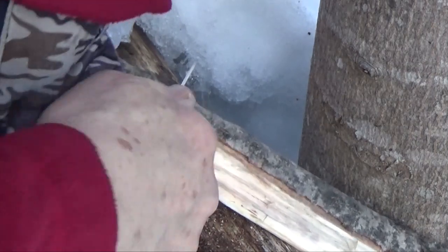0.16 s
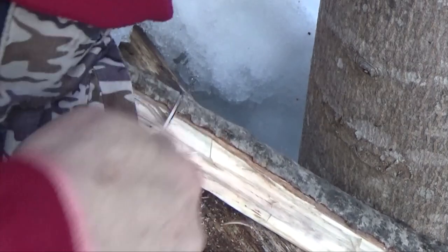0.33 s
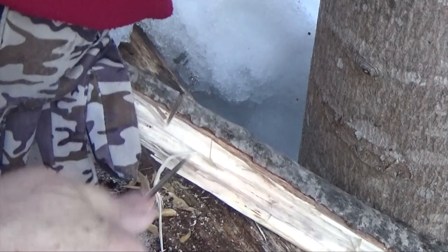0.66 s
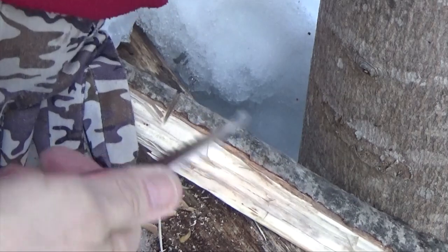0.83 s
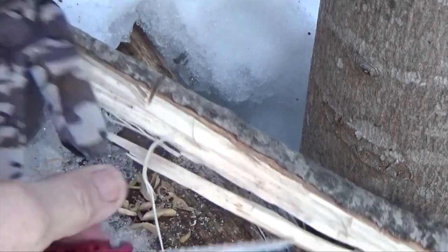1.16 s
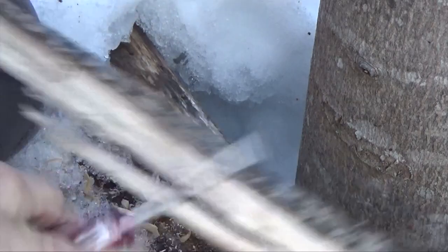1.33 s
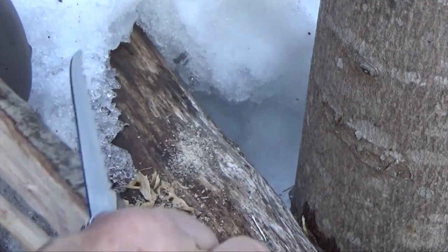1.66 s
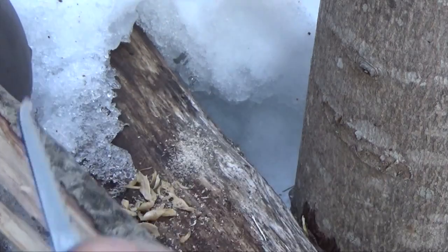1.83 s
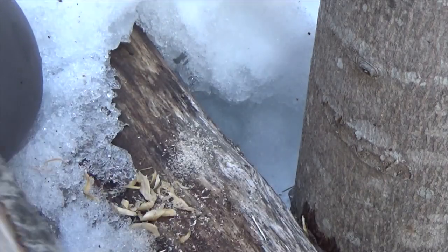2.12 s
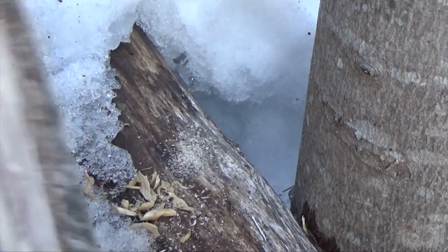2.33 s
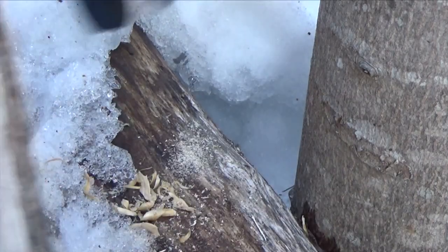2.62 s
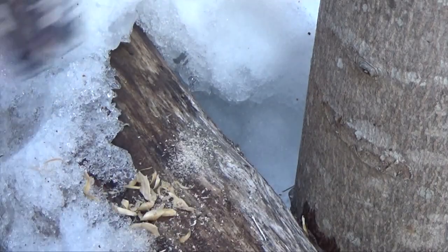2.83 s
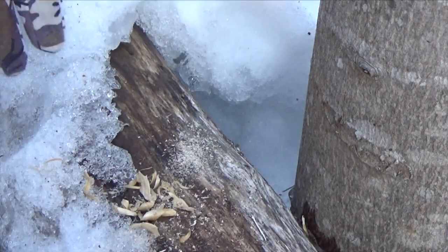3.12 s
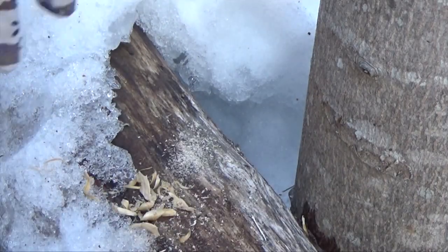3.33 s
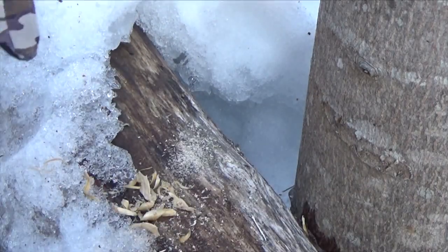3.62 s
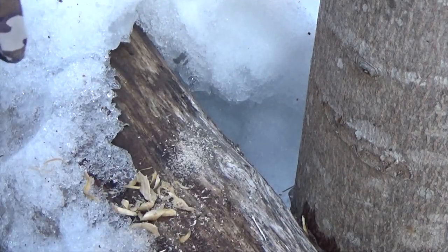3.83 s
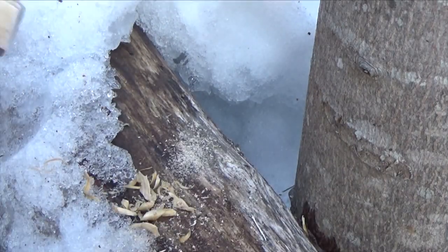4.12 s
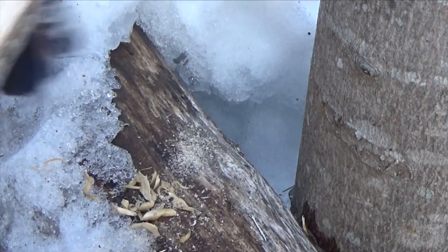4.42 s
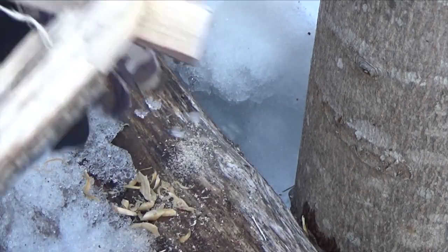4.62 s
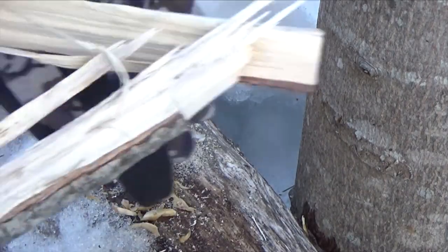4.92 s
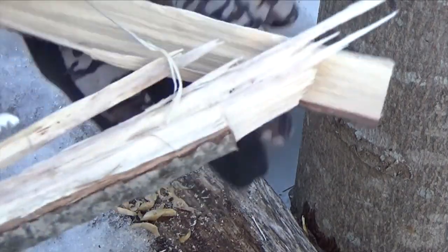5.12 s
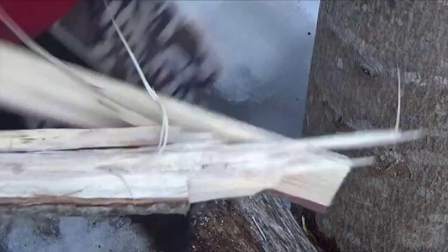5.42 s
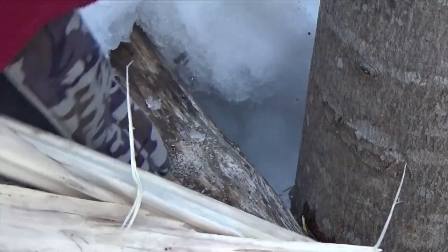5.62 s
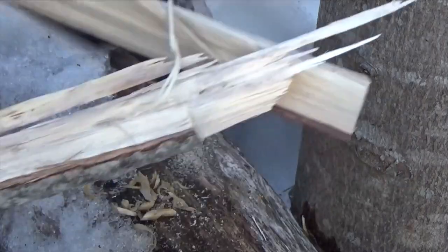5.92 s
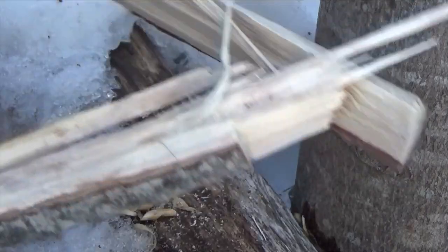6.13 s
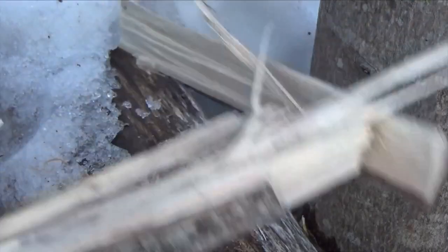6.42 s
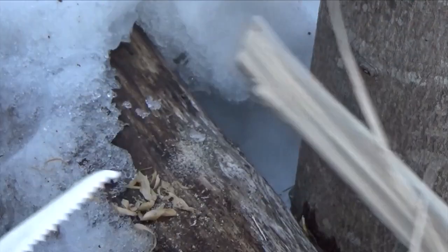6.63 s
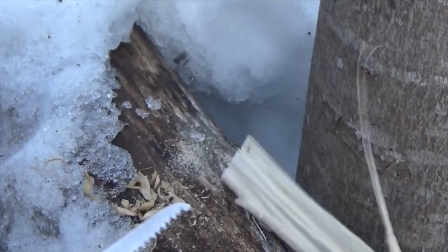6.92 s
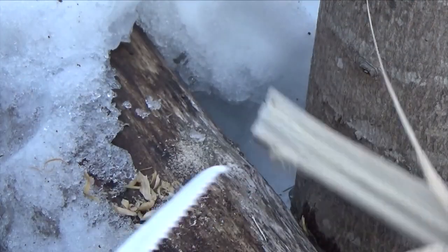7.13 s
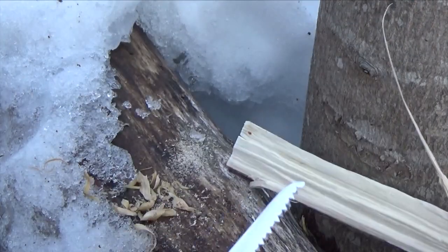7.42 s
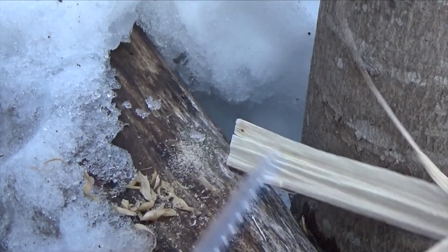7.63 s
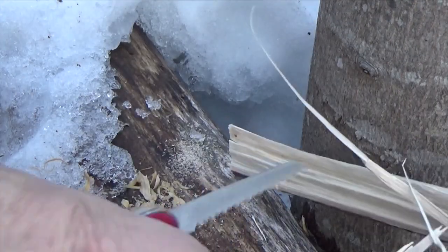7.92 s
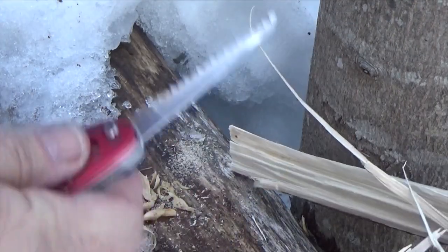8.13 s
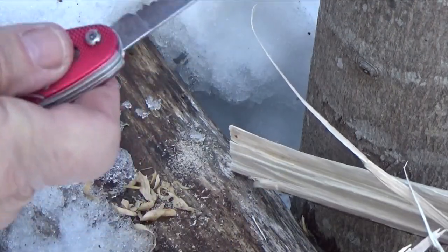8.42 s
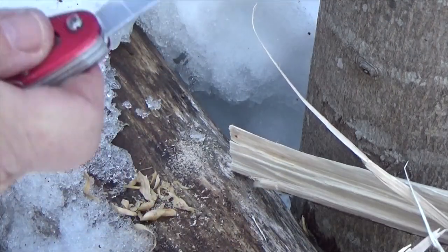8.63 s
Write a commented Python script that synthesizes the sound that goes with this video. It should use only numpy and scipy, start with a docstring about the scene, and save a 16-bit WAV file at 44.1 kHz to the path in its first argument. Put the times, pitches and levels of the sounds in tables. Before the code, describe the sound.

A small saw rasps briefly through a log outdoors; the piece is dragged off squeaking, its fibres snap in a flurry, then a blade taps ringing wood.

```python
"""A small folding saw makes quick strokes through a split log in snowy woods: rough noise for the teeth.
Gloved hands drag the piece off, rubbing and squeaking, and its fibres crack: short puffs of noise.
The blade then taps the cut end and the stick rings: fading sine tones. Low bumps come from the log below.
Behind it lie the filtered noise of a far road, a soft engine drone and a faint, quick, steady tick."""
import sys
import numpy as np
from scipy import signal
from scipy.fft import rfft, irfft
from scipy.io import wavfile
from scipy.ndimage import uniform_filter1d

SR = 44100
rng = np.random.default_rng(int(sys.argv[2]) if len(sys.argv) > 2 else 0)


def file_out(sig):
    """Save sig as 16-bit WAV at sys.argv[1]."""
    # one column per channel
    cols = np.atleast_2d(sig).T
    # limit, then scale
    lim = np.clip(cols, -1, 1)
    pcm = np.round(lim * 32767).astype(np.int16)
    wavfile.write(sys.argv[1], SR, pcm)


N = 386316

# Saw strokes: start_s, fastest_s, end_s, rasp_db, extra_bite_db (at the fastest point), log_body_db (above the rasp)
SAW_STROKES = [(-.03, 0.044, 0.078, -34, 4, -9), (0.072, .168, 0.19, -29, 9, -8.5),
               (0.226, 0.325, 0.39, -31, 4, -9.5), (0.38, 0.462, 0.511, -30, 9, -7),
               (0.548, 0.622, 0.696, -27.5, 5.5, -13)]
# Tone colour of the saw teeth: pitch_hz, level_db (per Hz)
RASP_COLOUR = [(710, -36.5), (1200, -3.5), (2080, -1), (3050, -6.5), (4470, -2.5), (5330, -6.5),
               (11400, -6), (15300, -14.5), (16500, -38)]
# Tone colour of the shaken log: pitch_hz, level_db (per Hz)
LOG_COLOUR = [(35, -94), (60, -21), (210, -14), (250, -2), (440, 3.5), (875, 2), (1500, -4.5), (1950, -3),
              (3300, -120)]
STROKE_SWELL, BITE_S = 1.46, .01  # power of the swell (no unit); half-length of the extra bite

# Road loudness, 1.5 dB below the final level: time_s, level_db
# It drops at 3.36 s and 7.0 s and creeps back up after the first drop
ROAD_LEVEL = [
    [(0, -55.5), (2.3, -55), (2.9, -52), (3.35, -56)],
    [(3.38, -62), (4.0, -63), (4.3, -62), (6.45, -58), (6.96, -54.5)],
    [(7.06, -59), (8.76, -58.5)],
]
# Tone colour of the road roar: pitch_hz, level_db (per Hz)
ROAR_COLOUR = [(15, -60), (25, -45), (154, -13), (422, -5), (524, -2), (854, -1), (1730, -15),
               (3320, -17.5), (3810, -18), (14800, -24), (16500, -49)]
# Extra colour of the left-right difference in the roar, before its overall level is set: pitch_hz, level_db
ROAR_WIDTH_COLOUR = [(60, -6), (200, -15), (700, -6), (2400, 2), (6000, -11.5), (15000, -42)]
# Far engine drones: start_s, end_s, pitch_hz, level_db (rms at the height of the swell)
ENGINE_DRONES = [(3.053, 3.36, 175, -71.5), (6.04, 6.653, 175.7, -71.5)]
TICK_RATE_HZ, TICK_START_S = 30000 / 1001, .0007
TICK_HZ, TICK_DB, TICK_SWING_DB = 3280, -5, 3  # level against the road; strong and weak in turn

# Cracking fibres and clicking splinters: time_s, strength_db
FIBRE_CRACKS = [(0.0318, -4.5), (0.0802, -24), (0.1934, -26), (0.2254, -18), (0.2843, -18.5), (0.3716, -25),
                (0.4489, -9.5), (0.594, -9.5), (1.07, -11.5), (1.1159, -18), (1.3668, -16), (1.6262, -15),
                (1.6856, -24), (1.7499, -22), (2.6633, -18), (2.7367, -25), (2.7487, -12.5),
                (2.8744, -16.5), (3.1971, -24.5), (3.3623, -5), (3.4331, -20.5), (3.4979, -24),
                (3.6022, -27), (3.7194, -34), (3.7359, -25.5), (3.7648, -10), (3.7923, -4.5), (3.8147, -8),
                (3.8536, -10), (3.8664, -10.5), (3.9853, -7.5), (4.0163, -5), (4.0427, -12.5), (4.0682, -3),
                (4.0921, 0.5), (4.1044, -8), (4.1094, -6.5), (4.1244, -7), (4.151, -8), (4.1554, -8),
                (4.1614, -7), (4.1684, -12), (4.1764, -17), (4.2054, -19), (4.2457, -28), (4.2822, -16.5),
                (4.3989, -25), (4.422, -35), (4.4618, -32), (4.5859, -27), (4.6064, -23.5), (4.7007, -5.5),
                (4.7301, -15), (4.774, -17), (4.8034, -26), (5.1517, -25), (5.2874, -21), (5.3198, -30),
                (5.4605, -27), (5.4894, -21), (5.5248, -11), (5.6994, -20), (5.7578, -26), (6.2387, -27.5),
                (7.0135, -5), (7.032, -35), (7.0414, -37), (7.3761, -17), (7.3894, -26), (7.454, -24),
                (7.4689, -26), (7.5906, -17.5), (7.7707, -17), (7.7977, -11), (7.8386, -15),
                (7.9508, -28.5), (8.2082, -30)]
# Tone colour of a crack: pitch_hz, level_db (per Hz)
CRACK_COLOUR = [(290, -47), (500, -38), (2890, -3.5), (3450, -10), (4550, -4.5), (7380, 2.5), (9600, -1),
                (14500, -24), (16500, 0.5)]
CRACK_RISE_S = 0.00043
AFTER_DB, AFTER_S = -18, 0.0088  # loosened fibres keep crackling just after each snap
# Dullness of a snap (more body, less treble): in the sawn log, the loose piece, under a tap, in the patter
SAWN_DULL_DB, LOOSE_DULL_DB, TAPPED_DULL_DB, FAINT_DULL_DB = 2.5, -5, 12, -12.5
# Faint splinters tick at random; PATTER_DB is the least strength, and chance adds to it
PATTER_PER_S, PATTER_DB, PATTER_SPAN_S = 7.8, -45, (0.95, 8.1)

# Glove, sleeve and bark rubs: start_s, peak_s, end_s, level_db, treble_db (above the level)
HAND_RUBS = [(0.147, 0.49, 1.3, -67, 10.5), (1.102, 1.112, 1.234, -50.5, 1.5),
             (1.188, 1.473, 1.626, -47.5, 6.5), (1.515, 1.562, 1.645, -42.5, 0.5),
             (1.63, 1.646, 1.88, -50, 0.5), (1.913, 2.143, 2.254, -46.5, 4.5),
             (2.185, 2.293, 2.476, -42.5, 0), (2.375, 2.37, 2.44, -52.5, 2), (2.39, 2.558, 2.92, -51, -6),
             (2.71, 2.747, 2.84, -51, 10.5), (2.831, 2.914, 3.024, -39, 3), (2.953, 3.086, 3.42, -57, 7.5),
             (3.354, 3.37, 3.58, -49, 7.5), (3.56, 3.612, 3.72, -60.5, 4), (3.776, 3.812, 3.94, -41.5, 1),
             (3.955, 3.958, 4.13, -47.5, 1), (4.16, 4.21, 4.44, -56, 4), (4.084, 4.111, 4.23, -38, 12),
             (4.34, 4.386, 4.47, -53, 1.5), (4.477, 4.478, 4.7, -57, 5), (4.558, 4.621, 4.77, -57.5, 11),
             (4.672, 4.755, 4.91, -49.5, 6.5), (4.877, 5.074, 5.1, -55, 5.5),
             (5.176, 5.275, 5.45, -62.5, 5), (5.453, 5.512, 5.71, -51.5, 7.5), (5.66, 5.682, 5.83, -54, 3),
             (6.39, 6.699, 5, -64.5, -8), (5.82, 6.04, 6.115, -56, 7), (7.005, 7.015, 7.045, -46, 2),
             (7.34, 7.351, 7.358, -34, 4), (7.37, 7.44, 7.53, -61, 5), (7.97, 8.012, 8.05, -53, 6),
             (7.66, 7.75, 8.1, -53, 6.5), (7.745, 7.785, 7.82, -45, 5)]
# Tone colour of the lower part of a rub: pitch_hz, level_db (per Hz)
RUB_LOW_COLOUR = [(600, -35.5), (1500, 2), (2400, 3.5), (3200, 4.5), (4300, 7), (5400, 4), (7000, -10.5),
                  (12000, -63)]
# Tone colour of the treble part of a rub: pitch_hz, level_db (per Hz)
RUB_HIGH_COLOUR = [(3500, -39.5), (6000, -1), (9400, 2), (13000, -4.5), (16500, -7.5)]
# A rub that peaks at once is mostly splinters; the later its peak, the more it is cloth
SUDDEN_GRIT, GRIT_LOSS = 0.95, 1.1

# The piece bumps on the log below: time_s, peak_db (before the bass cut), pitch_hz
LOG_BUMPS = [(0.319, -26.5, 355), (0.45, -17.5, 605), (.651, -21, 423), (1.588, -31.5, 435),
             (1.606, -33, 905), (4.018, -36.5, 726), (4.092, -33.5, 620), (4.152, -37.5, 406),
             (5.652, -41, 465)]

# Dry wood squeaks as it drags on bark: start_s, end_s, pitch_hz, level_db
WOOD_SQUEAKS = [(2.24, 2.422, 2500, -43.5), (2.35, 2.416, 4100, -42.5), (2.482, 2.74, 4420, -44.5),
                (4.934, 5.1, 5060, -52)]

# Blade knocks on the cut end: time_s, strength_db
BLADE_TAPS = [(6.987, -10), (7.019, -25.5), (7.312, -14), (7.359, -20)]
# Ringing tones of the stick: pitch_hz, level_db (chance shifts it per tap), fade_s (to fall by 60 dB)
STICK_TONES = [(435, -19, .045), (662, -12.5, .06), (1302, -11, .04), (1765, -3, .038), (2725, -9, .032),
               (3809, -15, .025)]
TAP_CONTACT_DB = -5  # snap of a tap against its table strength

# Where the hands work: time_s, left_minus_right_db, side_width_db
HAND_PLACE = [(0, -1, -57), (1.0, 2, -20), (1.5, -0.5, -89), (3.6, 1.5, -7.5), (4.6, -0.1, -20.5),
              (8.76, -0.3, -46)]
CUTOFF_HZ = 16900


def amp(db):
    """Turn decibels into gain."""
    return 10 ** (np.asarray(db) / 20)


def rms_one(x):
    """Scale a sound to an average strength (rms) of 1."""
    return x / np.sqrt(np.mean(x ** 2) + 1e-20)


def in_time(tables):
    """Join curve tables and read every column at each sample."""
    time_s, *columns = np.transpose(np.vstack(tables))
    return [np.interp(np.arange(N) / SR, time_s, column) for column in columns]


def colour(x, spectrum):
    """Filter a sound to the given tone colour, without sounding early; white noise keeps its strength."""
    hz, db = np.transpose(spectrum)
    grid = np.maximum(np.fft.rfftfreq(4096, 1 / SR), 1)
    # folding the cepstrum puts the filter's energy as early as possible (minimum phase)
    cepstrum = irfft(np.log(amp(np.interp(np.log(grid), np.log(hz), db))))
    cepstrum[1:2048] *= 2
    cepstrum[2049:] = 0
    kernel = irfft(np.exp(rfft(cepstrum)))
    return signal.oaconvolve(x, kernel / np.linalg.norm(kernel))[:N]


def drift(rate_hz):
    """Smooth noise into a slow random wander with spread 1."""
    r = np.exp(-2 * np.pi * rate_hz / SR)
    wander = signal.lfilter([1], [1, -2 * r, r * r], rng.standard_normal(N + SR))
    return rms_one(wander[SR:])  # the first second only settles the filter


def fade(pulses, fade_s):
    """Let each pulse die away smoothly, falling to about a third in fade_s."""
    return signal.lfilter([1], [1, -np.exp(-1 / (fade_s * SR))], pulses)


def ring(clicks, hz, t60):
    """A click of size 1 sets off a sine of height 1 that falls by 60 dB in t60 seconds."""
    r, w = amp(-60 / (t60 * SR)), 2 * np.pi * hz / SR
    return signal.lfilter([0, np.sin(w)], [1, -2 * r * np.cos(w), r * r], clicks + 1e-18)


def swell(start, peak, end, power):
    """Rise from start to peak and fall to the end."""
    ramp = np.interp(np.arange(N) / SR, [start, peak, end], [0, 1, 0])
    return np.sin(np.pi / 2 * ramp) ** power


def hump(start, end):
    """Rise and fall evenly, highest halfway."""
    progress = np.clip((np.arange(N) / SR - start) / (end - start), 0, 1)
    return np.sin(np.pi * progress)


def chips(clicks, cycles):
    """Each click rings one of 24 small slivers for some cycles; higher slivers get more gain."""
    pitches = np.geomspace(1100, 13000, 24) * rng.uniform(.96, 1.04, 24)
    dealt = rng.integers(0, 24, N)  # which sliver a click would strike
    return sum(hz / 4000 * ring(clicks * (dealt == k), hz, cycles / hz) for k, hz in enumerate(pitches))


def grit(per_s, spread_db, grain_s, smooth, ringing):
    """Friction: uneven catches give puffs of noise and ringing slivers over a smooth hiss; rms 1."""
    sizes = amp(spread_db * np.minimum(rng.exponential(1, N), 4.0))
    catches = sizes * (rng.random(N) < per_s / SR)
    puffs = fade(catches, grain_s)
    swarm = puffs * (rng.random(N) < 2500 / SR)  # a catch can free several slivers
    hiss = rms_one((rms_one(puffs) + smooth) * rng.standard_normal(N))
    return rms_one(hiss + ringing * rms_one(chips(swarm, cycles=53.0)))


def saw():
    """Teeth tear fibres in uneven catches and bite hardest at full speed; the same catches shake the log."""
    t, out = np.arange(N) / SR, np.zeros(N)
    teeth = grit(per_s=400, spread_db=1.5, grain_s=0.0019, smooth=0.94, ringing=0.6)
    rasp = colour(teeth, RASP_COLOUR)
    body = rms_one(colour(teeth, LOG_COLOUR))
    for start, fastest, end, rasp_db, bite_db, body_db in SAW_STROKES:
        bite = amp(bite_db * np.exp(-((t - fastest) / BITE_S) ** 2))
        stroke = amp(rasp_db) * swell(start, fastest, end, STROKE_SWELL) * bite
        out += stroke * (rasp + amp(body_db) * body)
    return out


def road():
    """Many far sounds blur into a roar: coloured noise whose strength wanders, in a middle and a side part."""
    mid, side = (colour(rng.standard_normal(N), ROAR_COLOUR) * amp(1.4 * drift(4.4)) for _ in range(2))
    side = amp(-13) * colour(side, ROAR_WIDTH_COLOUR)
    return mid + side * [[1], [-1]]  # opposite sign left and right makes it wide


def ticking():
    """Evenly spaced clicks, strong and weak in turn, each ring one short high tone."""
    times_s = TICK_START_S + np.arange(int(N / SR * TICK_RATE_HZ)) / TICK_RATE_HZ
    count = len(times_s)
    swing_db = TICK_SWING_DB * (-1) ** np.arange(count)
    clicks = np.zeros(N)
    clicks[(times_s * SR).astype(int)] = amp(TICK_DB + swing_db + rng.normal(0, 0.81, count))
    return ring(clicks, TICK_HZ, 0.036)


def engine():
    """A far engine drones as a swelling low sine whose phase wavers."""
    t, out = np.arange(N) / SR, np.zeros(N)
    for start, end, hz, db in ENGINE_DRONES:
        tone = np.sin(2 * np.pi * hz * t + .5 * drift(3.7))
        out += np.sqrt(2) * amp(db) * hump(start, end) * tone
    return out


def background():
    """Road and ticking share one changing level; the engine drone is added on top."""
    level, = amp(in_time(ROAD_LEVEL))
    return level * amp(1.5) * (road() + ticking()) + engine()


def crack_rows():
    """List time_s, strength_db and dullness_db of all snaps: cracks, tap contacts and faint random patter."""
    chance = rng.random((400, 2))
    first_s, last_s = PATTER_SPAN_S
    patter_s = first_s - np.cumsum(np.log(chance[:, 0])) / PATTER_PER_S  # random gaps
    patter_db = PATTER_DB - 3.0 * np.log(chance[:, 1])
    patter = np.c_[patter_s, patter_db][patter_s < last_s]
    sawing = np.transpose(FIBRE_CRACKS)[0] < SAW_STROKES[-1][2]  # before the last stroke ends
    contacts = np.add(BLADE_TAPS, [0, TAP_CONTACT_DB])
    return np.vstack([np.c_[FIBRE_CRACKS, np.where(sawing, SAWN_DULL_DB, LOOSE_DULL_DB)],
                      np.c_[contacts, np.full(len(contacts), TAPPED_DULL_DB)],
                      np.c_[patter, np.full(len(patter), FAINT_DULL_DB)]]).T


def cracks():
    """Each snap is a fast-dying puff of noise and slivers; a dull one has more body and less treble."""
    time_s, strength_db, dull_db = crack_rows()
    slivers = rms_one(chips(rng.standard_normal(N) * (rng.random(N) < 9000 / SR), cycles=37.0))
    noise = colour(rms_one(rng.standard_normal(N) + 1.7 * slivers), CRACK_COLOUR)
    out = np.zeros(N)
    # band edges in Hz, filter kind, share in dB, fade in s
    parts = [(2800, "low", dull_db + 2.0, .0017),
             ((2800, 7500), "band", 0, .0012),
             (7500, "high", -2.0 - dull_db / 2, .001)]
    for edges_hz, kind, share_db, fade_s in parts:
        starts = np.zeros(N)
        starts[(time_s * SR).astype(int)] = amp(strength_db + share_db)
        starts = fade(starts + 1e-18, CRACK_RISE_S) / (CRACK_RISE_S * SR)  # soften the onset
        band = signal.sosfilt(signal.butter(2, edges_hz, kind, fs=SR, output="sos"), noise)
        # even out the noise so that the table sets the strength of each crack
        band *= band.std() / np.sqrt(uniform_filter1d(band ** 2, size=120) + 1e-12)
        for gain, lasts_s in (1, fade_s), (amp(AFTER_DB), AFTER_S):
            out += gain * band * fade(starts + 1e-18, lasts_s)
    return signal.sosfilt(signal.butter(2, 700, "high", fs=SR, output="sos"), out)


def rubbing():
    """Each rub swells and fades: smooth cloth hiss, splintery grit, or a blend."""
    low, high = np.zeros(N), np.zeros(N)
    cloth = rng.standard_normal(N) * amp(1.4 * drift(12.3))
    splinters = grit(per_s=120, spread_db=4.5, grain_s=0.0016, smooth=0.11, ringing=1.77)
    for start, peak, end, level_db, treble_db in HAND_RUBS:
        share = np.clip(SUDDEN_GRIT - GRIT_LOSS * (peak - start) / (end - start), 0, 1)
        blend = np.sqrt(1 - share) * cloth + np.sqrt(share) * splinters
        contact = amp(level_db) * swell(start, peak, end, 1.57) * blend
        low += contact
        high += amp(treble_db) * contact
    return colour(low, RUB_LOW_COLOUR) + colour(high, RUB_HIGH_COLOUR)


def bumps():
    """A soft contact of a few milliseconds shakes one damped low tone of the wood."""
    out, after = np.zeros(N), np.arange(600)
    for time_s, peak_db, hz in LOG_BUMPS:
        push = np.zeros(N)
        at = int(time_s * SR)
        push[at:at + 600] = rng.standard_normal(600) * np.exp(-after / (0.0035 * SR))
        thud = ring(push, hz, 5.3 / hz)
        out += amp(peak_db) * thud / np.abs(thud).max()
    return signal.sosfilt(signal.butter(4, 190, "high", fs=SR, output="sos"), out)


def squeaks():
    """Stick and slip: uneven catches drive a narrow resonance, made of two close tones."""
    out = np.zeros(N)
    catches = amp(4.0 * rng.exponential(1, N)) * (rng.random(N) < 150 / SR)
    slips = catches + 0.018 * rng.standard_normal(N)
    for start, end, hz, db in WOOD_SQUEAKS:
        tone = rms_one(sum(ring(slips, hz * near, 0.018) for near in (.985, 1.015)))
        out += amp(db) * hump(start, end) * tone
    return signal.sosfilt(signal.butter(2, 1000, "high", fs=SR, output="sos"), out)


def taps():
    """Every knock sets off all the ringing tones of the stick, in slightly different strengths."""
    time_s, strength_db = np.transpose(BLADE_TAPS)
    out = np.zeros(N)
    chance_db = rng.normal(0, 1.5, (len(time_s), len(STICK_TONES)))
    for k, (hz, db, t60) in enumerate(STICK_TONES):
        clicks = np.zeros(N)
        clicks[(time_s * SR).astype(int)] = amp(strength_db + db + chance_db[:, k])
        out += ring(clicks, hz, t60)
    return signal.sosfilt(signal.butter(5, 380, "high", fs=SR, output="sos"), out)


def scene():
    """A short smeared copy, wandering in strength and sign, widens the sound as the work moves."""
    work = saw() + cracks() + rubbing() + bumps() + squeaks() + taps()
    pan_db, width_db = in_time([HAND_PLACE])
    smear = rng.standard_normal(500) * np.exp(-np.arange(500) / (.002 * SR))
    smeared = signal.oaconvolve(work, smear / np.linalg.norm(smear))[:N]
    side = amp(width_db) * np.tanh(2 * drift(3.5)) * smeared
    placed = work * amp(np.array([pan_db, -pan_db]) / 2)
    return placed + side * [[1], [-1]] + background()


def record(dry):
    """Peaks are gently rounded, the deep bass is thinned, the top is cut steeply."""
    rounded = np.tanh(dry)
    thinned = signal.lfilter(*signal.butter(1, 35, "high", fs=SR), rounded)
    return signal.sosfilt(signal.cheby2(10, 60, CUTOFF_HZ, fs=SR, output="sos"), thinned)


dry = scene()
out = record(dry)
file_out(out)
```